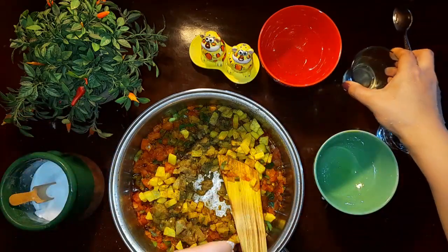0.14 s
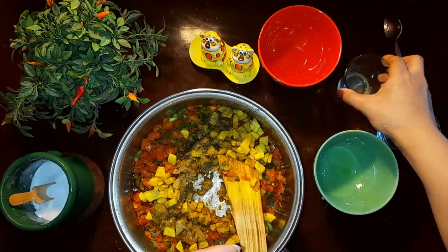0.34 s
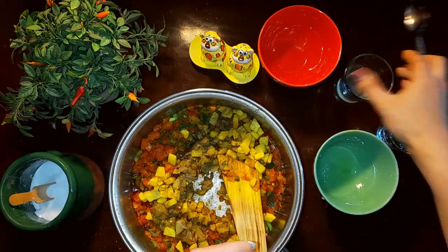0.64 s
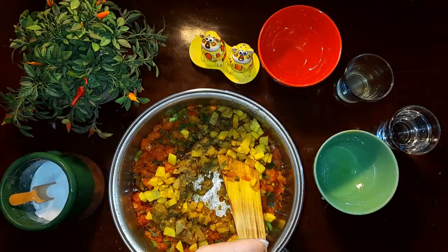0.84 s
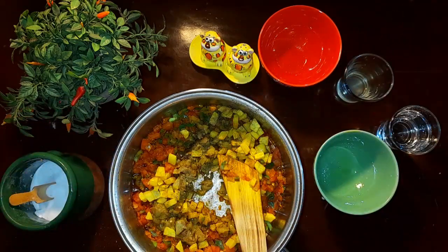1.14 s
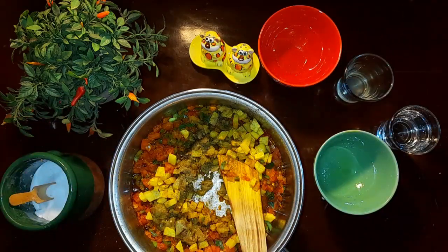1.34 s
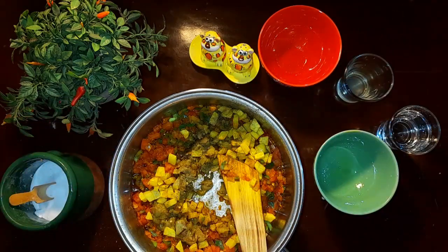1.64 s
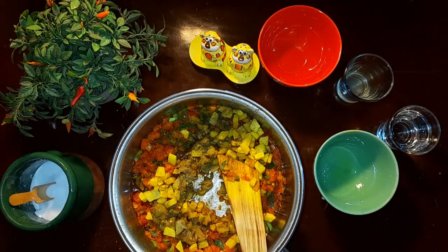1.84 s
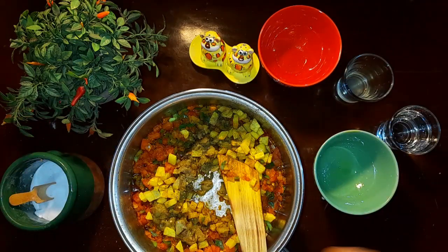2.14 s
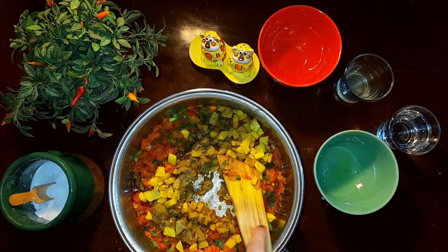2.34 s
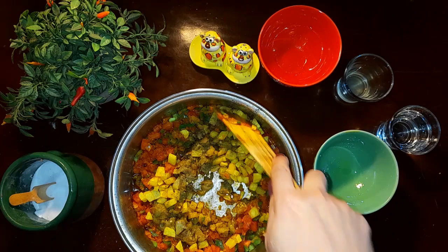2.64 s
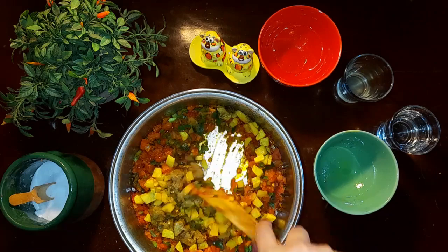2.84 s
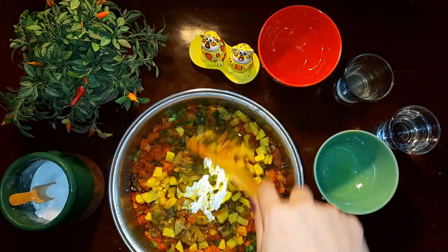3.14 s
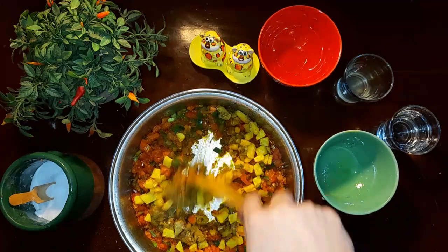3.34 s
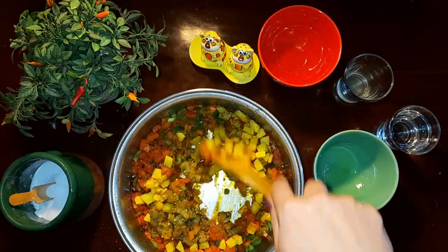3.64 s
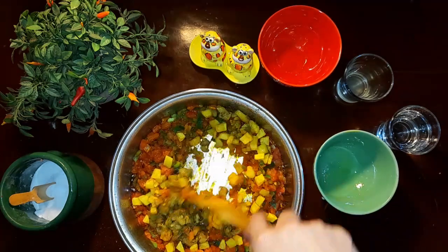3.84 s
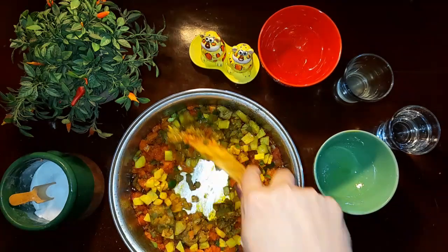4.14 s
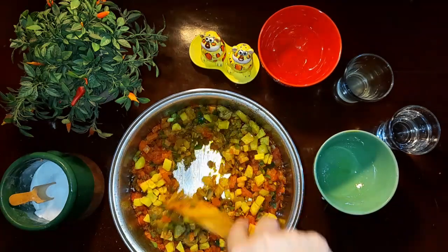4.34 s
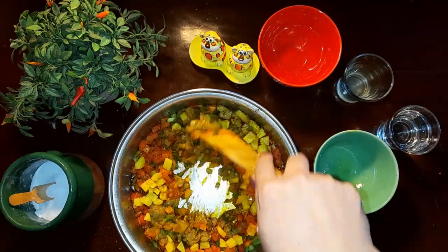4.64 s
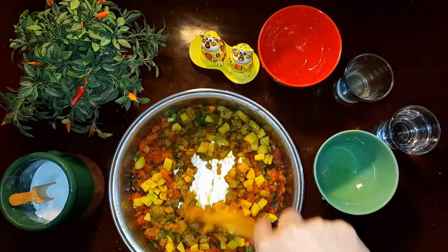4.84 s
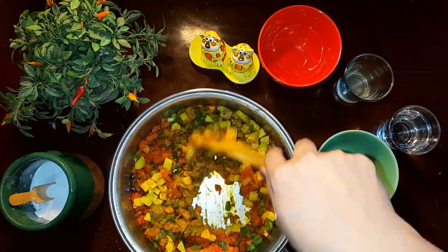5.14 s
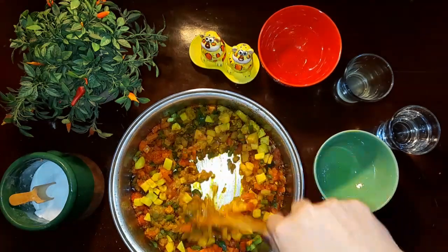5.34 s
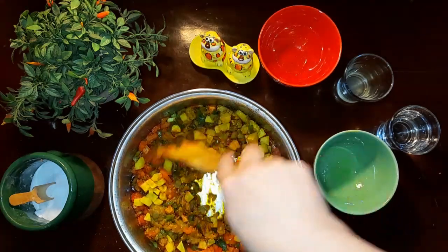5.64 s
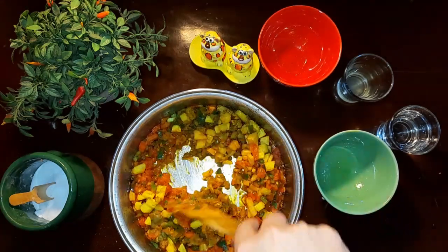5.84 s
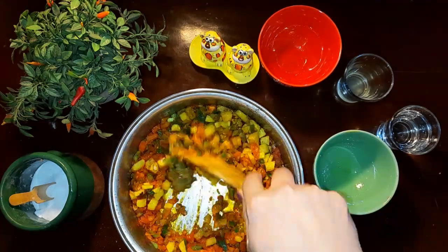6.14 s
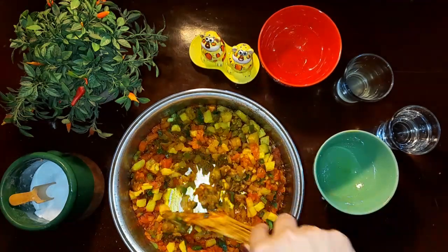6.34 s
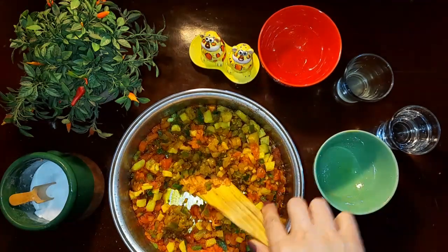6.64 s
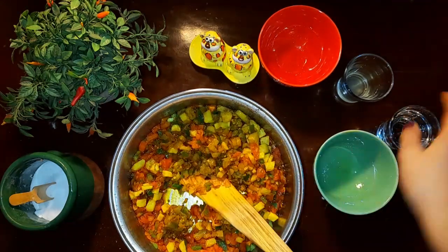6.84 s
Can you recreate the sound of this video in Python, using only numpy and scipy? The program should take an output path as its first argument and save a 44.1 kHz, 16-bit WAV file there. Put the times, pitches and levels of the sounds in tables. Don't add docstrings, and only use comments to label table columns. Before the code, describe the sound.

Close kitchen sounds: glass knock, two bright spoon clinks, then wet, scratchy stirring with tiny snaps, ended by a hollow plastic bowl knock.

```python
import sys
import numpy as np
from scipy import signal
from scipy.fft import rfft, irfft, next_fast_len
from scipy.io import wavfile
from scipy.ndimage import uniform_filter1d, map_coordinates

SR = 44100
rng = np.random.default_rng(int(sys.argv[2]) if len(sys.argv) > 2 else 0)


def gain_from_db(level_db):
    decades = np.asarray(level_db, float) / 20
    return 10 ** decades


def digitize_waveform(pressure):
    field = np.atleast_2d(pressure).T
    bounded = np.clip(field, -1, 1)
    quanta = np.round(bounded * 32767).astype(np.int16)
    wavfile.write(sys.argv[1], SR, quanta)


N = 308700
TIME = np.arange(N) / SR

# [t/s, push lasts/s, dies away in/s, scrape level/dB, wet crackle level/dB]
STROKES = [(2.301, 0.048, 0.13, -76.5, -100), (2.567, 0.043, 0.051, -94, -77),
           (2.633, 0.042, 0.037, -91, -71.5), (2.791, 0.18, 0.058, -73.5, -69.5),
           (3.097, 0.06, 0.14, -74.5, -67), (3.213, 0.064, 0.12, -78, -73), (3.393, 0.0083, 0.43, -72, -67),
           (3.639, 0.0079, 0.17, -69, -65), (3.874, 0.011, 0.14, -59, -58), (4.098, 0.05, 0.16, -66, -63),
           (4.312, 0.048, 0.073, -64, -66.5), (4.39, 0.043, .13, -73, -67),
           (4.589, 0.0082, 0.2, -67, -61.5), (4.809, 0.09, 0.096, -64.5, -62),
           (4.977, 0.027, 0.07, -77, -69.5), (5.05, 0.139, 0.1, -68.5, -63.5),
           (5.286, 0.055, 0.13, -85, -74.5), (5.343, 0.23, 0.09, -70, -65.5), (5.758, 0.16, 0.19, -69, -65),
           (6.055, 0.072, 0.12, -83.5, -72.5), (6.137, 0.17, 0.17, -68, -64.5),
           (6.36, 0.034, 0.067, -64, -60.5), (6.5, 0.18, .15, -78, -66.5)]
# [f/Hz, time to fall 60 dB/s]
KITCHEN = [(100, 0.17), (500, 0.51), (2000, 0.41), (6000, 0.34), (11000, 0.26), (15000, 0.22)]


def along(points, hz):
    f, v = np.transpose(points)
    return np.interp(np.log(hz + 1), np.log(f + 1), v)


def unit(x):
    return x / np.sqrt(np.mean(x ** 2) + 1e-20)


def wobble(rate):
    return map_coordinates(rng.standard_normal(int(N * rate / SR) + 4), [TIME * rate])


def filtered(x, response):
    m = next_fast_len(x.shape[-1] + 8192)
    return irfft(rfft(x, m) * response(np.fft.rfftfreq(m, 1 / SR)), m)[..., :x.shape[-1]]


def diffuse(pair, spectrum):
    # [f/Hz, left-right likeness]
    alike = [(60, 0.95), (130, 0.84), (290, 0.67), (640, 0.47), (1410, 0.1), (3100, 0.08), (6820, -0.04),
             (15000, -0.02)]

    def response(hz):
        turn = np.arccos(np.clip(along(alike, hz), -1, 1)) / 2
        return gain_from_db(along(spectrum, hz)) * [np.cos(turn), np.sin(turn)]

    mid, side = filtered(pair, response)
    return np.array([mid + side, mid - side])


def room(x):
    hz, t, z = signal.stft(rng.standard_normal((2, SR // 2)), SR, nperseg=256)
    fall = gain_from_db(-60 * t / along(KITCHEN, hz)[:, None])
    tail = signal.istft(z * fall, SR, nperseg=256)[1]
    build_up = 1 - np.exp(-TIME[:tail.shape[1]] / 0.0023)
    tail = diffuse(tail * build_up, [(20, 0)])
    return signal.fftconvolve(x[None], tail / np.linalg.norm(tail[0]), axes=1)[:, :len(x)]


def damped(events, cycles, spread, pan_db):
    s, db, hz = np.transpose(events)[:, :, None]
    step = np.arange(int(min(5000, 9 * cycles * SR / hz.min())))
    luck = rng.random((len(s), 10))
    age = step / SR * hz / cycles
    at = np.minimum(np.round(s * SR).astype(int) + step, N - 1).ravel()
    out = []
    for ear, side in enumerate([1, -1]):
        wave = 0
        for k in range(3):
            pitch = np.minimum(hz * (1 + spread * (k - 1) * luck[:, [k]]), 16000)
            wave = wave + np.sin(2 * np.pi * (pitch * step / SR + luck[:, [3 + 3 * ear + k]]))
        size = gain_from_db(db + side * pan_db * (luck[:, [9]] - .5)) * age * np.exp(1 - age)
        out.append(np.bincount(at, (size * wave).ravel(), N))
    return np.array(out)


def stirring():
    # [f/Hz, level/dB per Hz]
    scrape_colour = [(1120, -46.5), (1900, -11), (2970, -2.5), (4900, 2), (6910, -12), (8500, -10.5),
                     (11000, -33), (18700, -120)]
    crackle_colour = [(2350, -56.5), (4000, -1), (8050, -6), (10300, 5), (11900, 2), (14800, -3.5),
                      (16000, -17), (16500, -25)]
    squelch_colour = [(400, -44), (700, 0), (1100, -1), (1900, -2), (2600, -36)]
    # [t/s, peak level/dB, f/Hz]
    snap_events = [(2.4764, -70.5, 9380), (2.7945, -51.5, 12250), (2.8543, -57, 13800),
                   (2.9507, -57.5, 9680), (3.1179, -37.5, 13800), (3.1443, -55, 11400),
                   (3.1678, -49, 11900), (3.2674, -59, 9350), (3.362, -54.5, 9640), (3.3947, -54.5, 10100),
                   (3.4177, -44, 9700), (3.5406, -54, 9220), (3.6324, -48.5, 9120), (3.6545, -49.5, 11400),
                   (3.7827, -59, 9900), (3.876, -41.5, 10800), (3.9569, -50.5, 13500), (4.1086, -45, 10800),
                   (4.2964, -43.5, 10900), (4.3572, -51.5, 12200), (4.3983, -48, 13200),
                   (4.4908, -53, 13700), (4.596, -49, 7530), (4.6596, -54, 9800), (4.6944, -42.5, 9870),
                   (4.779, -54, 10400), (4.8088, -47.5, 10000), (4.8489, -48, 10500),
                   (4.9098, -37.5, 11800), (4.9801, -42, 13200), (4.9977, -53, 14400),
                   (5.0451, -43.5, 11040), (5.128, -46, 9280), (5.1854, -44.5, 12300),
                   (5.2665, -43.5, 12200), (5.2957, -50, 10800), (5.363, -52, 10200), (5.453, -50, 10000),
                   (5.4864, -51, 10200), (5.4973, -49, 12860), (5.5162, -48, 9200), (5.5481, -48, 9120),
                   (5.5744, -51, 14400), (5.7668, -46.5, 9500), (5.8311, -51, 10900), (5.881, -50, 10200),
                   (6.0157, -57, 13900), (6.0541, -57, 9860), (6.113, -53.5, 11500), (6.1402, -51, 8040),
                   (6.2488, -44.5, 11700), (6.2949, -47.5, 10050), (6.3506, -47, 13100),
                   (6.3632, -37, 12400), (6.3891, -42, 11800), (6.4847, -47.5, 9600), (6.5067, -47, 12800),
                   (6.5425, -53.5, 13200), (6.576, -48, 10300), (6.6347, -45, 11900)]
    # [t/s, peak level/dB, f/Hz]
    catches = [(2.477, -68, 3500), (3.4179, -54, 3250), (3.5404, -53, 5170), (3.8582, -59, 3880),
               (3.8757, -39, 3050), (3.888, -44, 3300), (4.0921, -48, 3580), (4.1091, -45.5, 3920),
               (4.323, -47.5, 4400), (4.5961, -41, 4500), (4.9095, -49, 5250), (5.3523, -62, 3870),
               (6.133, -53.5, 4650), (6.1684, -50, 4900), (6.1988, -49, 5360), (6.3372, -51.5, 4000)]
    # [t/s, peak level/dB, f/Hz, ring of the steel/dB]
    bump_events = [
        (2.916, -66, 605, -103),
        (3.881, -60.5, 246, -88),
        (4.101, -52, 274, -87),
        (5.039, -67, 238, -72),
        (5.14, -52.5, 236, -92.5),
        (5.765, -66, 863, -79),
        (5.799, -72, 227, -78),
        (6.201, -59, 247, -76.5),
    ]
    scrape_top, crackle_top = np.transpose(STROKES)[-2:]
    scrape_db = strokes(scrape_top, dies=1.45)
    crackle_db = strokes(crackle_top, dies=1)
    squelch_db = -94 + 0.86 * (scrape_db - scrape_top.mean())

    squelch = gain_from_db(squelch_db + 7.5 + 3.1 * wobble(29)) * unit(diffuse(patchy(depth_db=3.5), squelch_colour))
    scrape = gain_from_db(scrape_db - 2.5 + 3.5 * wobble(30)) * unit(diffuse(patchy(depth_db=3.0), scrape_colour))
    crackle = gain_from_db(crackle_db - 0.5 + 1.8 * wobble(40)) * unit(diffuse(patchy(depth_db=5.5), crackle_colour))

    hits = tumbling(scrape_db - 5.5, count=700, centre_hz=4350, spread_db=4)
    hits += tumbling(crackle_db - 8.0, count=2000, centre_hz=10420, spread_db=5.0)
    hits += gain_from_db(-2.5) * damped(snap_events, cycles=2.1, spread=0.4, pan_db=9)
    hits += gain_from_db(-4.0) * damped(catches, cycles=3.0, spread=0.094, pan_db=5.5)
    thumps = [(s, db, hz) for s, db, hz, _ in bump_events]
    steel = [(s, ring_db, 2170) for s, _, _, ring_db in bump_events]
    hits += gain_from_db(1.0) * damped(thumps, cycles=2.1, spread=0.17, pan_db=2.0)
    hits += damped(steel, cycles=42, spread=.03, pan_db=3)
    return scrape + crackle + squelch + hits + gain_from_db(-11.5) * room(hits[0])


def strokes(top_db, dies):
    bite_db, bite_s = 11.5, 0.0056
    lead_db_per_s, sag_db_per_s = 230, 13
    s, push, fade = np.transpose(STROKES)[:3, :, None]
    age = TIME[::64] - s
    before = bite_db * np.clip(-age / bite_s, 0, 1) + lead_db_per_s * np.maximum(-age, 0)
    sag = sag_db_per_s * np.clip(age, 0, push)
    after = sag + dies * 20 * np.maximum(age - push, 0) / fade
    level = np.sum(gain_from_db(top_db[:, None] - before - after), 0) + 1e-7
    level_db = np.interp(TIME, TIME[::64], 20 * np.log10(level))
    return np.where(TIME < 6.73, level_db, -140)


def patchy(depth_db):
    z = signal.stft(rng.standard_normal((2, N)), nperseg=256)[2]
    field = uniform_filter1d(rng.standard_normal(z.shape[1:]), size=22, axis=0)
    field = uniform_filter1d(field, size=2, axis=1)
    return signal.istft(z * gain_from_db(depth_db * unit(field)), nperseg=256)[1][:, :N]


def tumbling(level_db, count, centre_hz, spread_db):
    luck = rng.random((count, 3))
    s = 2.2 + 4.5 * luck[:, 0]
    hz = np.clip(centre_hz * 2 ** (1.43 * (luck[:, 1] - .5)), 2500, 15000)
    size_db = level_db[(s * SR).astype(int)] - spread_db * np.log(luck[:, 2] + 0.07)
    return damped(np.transpose([s, size_db, hz]), cycles=1.7, spread=.3, pan_db=6.5)


def glass_down():
    # [t/s, peak level/dB]
    hit = [
        (.4775, -25.5),
        (.4802, -13),
        (.4875, -18),
        (.524, -27),
        (.552, -26),
    ]
    # [f/Hz, level/dB, time to fall 60 dB/s]
    wood = [(128.7, -1, 0.12), (258, 3.5, .12), (430, 0, 0.081), (477, -2.5, 0.22), (598, -3, .08),
            (673.7, 2, 0.11), (823, -9, 0.072), (967, -11, .1), (1136, -9, .1), (1433, -11.5, .08),
            (1666, -11, .1), (1716, -7, 0.11), (2050, -8, .09), (2410, -9, .07)]
    jingle = [(2900, -19, .08), (4720, -22, .15), (4770, -14, .1), (6336, -22.5, .1), (8091, -26, .1),
              (8323, -26, .1), (9500, -25, .12), (11100, -27.5, .1), (11830, -30, .12), (12550, -28, .09),
              (13800, -29, .09), (14760, -29.5, .1)]
    # [f/Hz, level/dB per Hz]
    thud = [(29, -48.5), (50, -76.5), (108, -7), (193, -6.5), (418, -5), (927, -7.5), (1700, -12),
            (4240, -28.5), (4790, -28), (7390, -37), (8140, -31.5), (14200, -37.5), (16000, -40.5)]
    # [f/Hz, left over right/dB]
    place = [(300, 0), (3000, 2), (7000, 3), (10000, 5), (15000, 2.5)]
    return blow(hit, wood + jingle, thud, place, ring_db=-18.0, crowd_db=-6.5, rise_s=0.0012,
                build_cycles=0.92, rattle=0.7, crack_db=-0.5, crack_s=.08, wet_db=-1)


def glass_ring():
    let_go_s, swell_s, stilled_s = .7, .08, 1.023
    phase = 2 * np.pi * 1625 * TIME
    age = TIME - let_go_s
    fall_db = np.maximum(-62 - 148 * np.maximum(age, 0), -80.5)
    edge = np.maximum(-age, 2 * (TIME - stilled_s)) / swell_s
    return gain_from_db(fall_db - 41 * np.clip(edge, 0, 4)) * np.array([np.sin(phase), np.sin(phase + 2.4)])


def spoon_down():
    # [t/s, peak level/dB]
    hit = [
        (1.3457, -10),
        (1.3565, -21),
        (1.3655, -17),
    ]
    # [f/Hz, level/dB, time to fall 60 dB/s]
    counter = [(150, -24, .1), (244, -16, 0.12), (305, -13, 0.14), (428.2, -10, .09), (640, -26, .06),
               (1140, -27.5, .06), (1780, -27, .06), (2310, -23.5, 0.065)]
    steel = [(2874, -8.5, .1), (3330, -20, 0.12), (4598, -11.5, 0.11), (4747, -9, 0.099),
             (6320, -13.5, .14), (6800, -16, .1), (7060, -7.5, 0.087), (8000, -14.5, 0.055),
             (8274, -2.5, 0.099), (9792, -9.5, .13), (10120, -4.5, .07), (11240, -7, 0.076),
             (11330, -2.5, .07), (11765, -15, 0.093), (12680, -15, 0.045), (13900, -8.5, 0.066),
             (14600, -3, .03), (15340, -11.5, .07)]
    # [f/Hz, level/dB per Hz]
    clink = [(35, -43.5), (60, -10), (422, -9), (1400, -18.5), (2830, -10.5), (4640, -10), (5870, -14.5),
             (8150, -3.5), (8960, -18), (10800, -8.5), (15000, -13), (16500, -32)]
    # [f/Hz, left over right/dB]
    place = [(300, -0.5), (3000, 6), (7500, 2.5), (9800, 8), (15000, 4)]
    return blow(hit, counter + steel, clink, place, ring_db=-7.0, crowd_db=-7, rise_s=0.0003,
                build_cycles=5.9, rattle=0.6, crack_db=-0.5, crack_s=0.03, wet_db=-3.5)


def spoon_drop():
    # [t/s, peak level/dB]
    hit = [
        (1.8632, -14.5),
        (1.8725, -15),
        (1.885, -24),
    ]
    # [f/Hz, level/dB, time to fall 60 dB/s]
    steel = [(2790, -20, .15), (3377, -13, 0.19), (4710, -15.5, .25), (6293, -13, .17),
             (7200, -21.5, 0.072), (7570, -20.5, .08), (7960, -16.5, .1), (8200, -13, .08),
             (9510, -12.5, 0.061), (9771, 4, 0.059), (10138, -19.5, .1), (11220, -8.5, .08),
             (11700, -7.5, .1), (12500, -16.5, .12), (13220, -15, 0.092), (13920, -12, .11),
             (14630, -8.5, .09), (15300, -16, .07)]
    # [f/Hz, level/dB per Hz]
    clank = [(60, -29), (400, -14), (694, -17), (1580, -22.5), (2790, -12.5), (3900, -13), (8230, -16),
             (8890, -22), (9860, 0.5), (10600, -20), (11500, -17.5), (14900, -10), (16500, -39.5)]
    # [f/Hz, left over right/dB]
    place = [(1000, 5), (4500, 1), (7500, 2), (9800, 13), (12000, 5.3), (15000, 3.7)]
    # [t/s, peak level/dB, f/Hz]
    jolt = [
        (1.863, -25, 62),
        (1.863, -21, 130),
        (1.864, -23, 210),
    ]
    shock = damped(jolt, cycles=.38, spread=0.15, pan_db=0.5) * gain_from_db([[-3.0], [-30]])
    return shock + blow(hit, steel, clank, place, ring_db=-5.0, crowd_db=-13, rise_s=0.0007,
                        build_cycles=3, rattle=.35, crack_db=-1.5, crack_s=.06, wet_db=-3.0)


def bowl_knock():
    # [t/s, peak level/dB]
    hit = [
        (6.7445, -24),
        (6.7675, -31),
    ]
    # [f/Hz, level/dB, time to fall 60 dB/s]
    shell = [(236, -12, 0.14), (303, -11, 0.13), (374.7, 3, 0.12), (522, -7, 0.14), (705, -16, 0.095),
             (969.3, -22, 1.05), (1263, -11, .1), (1790, -15, .09), (1890, -17, 0.21), (2352, -14, 0.16),
             (2700, -13, 0.062), (3327, -15, .22), (3530, -10, .1), (4120, -11, 0.18), (4207, -8, 0.22),
             (4335, -11, .13), (4480, -9, .1), (4585, 0, 0.13), (5030, 2, 0.098), (5604, -16, 0.18)]
    # [f/Hz, level/dB per Hz]
    knock = [(88, -70), (150, -28), (368, -10), (637, -9.5), (1240, -12.5), (1630, -17), (2550, -9),
             (3770, -18.5), (5050, -16), (6000, -12.5), (14400, -20.5), (15200, -46)]
    # [f/Hz, left over right/dB]
    place = [(400, 0), (2500, 1.5), (5000, -3), (7500, 0.5), (9800, 6.5), (15000, -9)]
    # [t/s, peak level/dB, f/Hz]
    clicks = [
        (6.7452, -33.5, 1178),
        (6.7462, -32.5, 2080),
        (6.7458, -32, 2560),
        (6.7452, -23.5, 6230),
        (6.7452, -35, 8800),
        (6.7672, -38, 1150),
        (6.7675, -38, 2570),
    ]
    contact = gain_from_db(-5.5) * damped(clicks, cycles=2.3, spread=.1, pan_db=2)
    return contact + blow(hit, shell, knock, place, ring_db=-8.0, crowd_db=-11.5, rise_s=0.0046,
                          build_cycles=5.8, rattle=0.23, crack_db=4.5, crack_s=0.033, wet_db=-4.5)


def blow(hit, modes, colour, place, ring_db, crowd_db, rise_s, build_cycles, rattle, crack_db, crack_s, wet_db):
    s, db = np.transpose(hit)
    lag = np.round((s - s[0]) * SR).astype(int)
    ring = ringing(lag, db, modes, ring_db, crowd_db, rise_s, build_cycles, rattle)
    crack, push = cracking(colour, crack_db, crack_s)
    bounces = np.bincount(lag, gain_from_db(db))[None]

    def again(x):
        return signal.fftconvolve(x, bounces, axes=1)[:, :x.shape[1]]

    push = again(push[None])[0] * np.linalg.norm(crack[0]) / np.linalg.norm(push)
    walls = room(gain_from_db(-7) * ring[0] + push)
    ears = ring + again(crack) + gain_from_db(wet_db) * walls
    ears = filtered(ears, lambda hz: gain_from_db(np.outer([.5, -.5], along(place, hz))))
    ears[1] = np.roll(ears[1], 12)
    out = np.zeros((2, N))
    part = out[:, round(s[0] * SR):]
    part += ears[:, :part.shape[1]] if part.shape[1] <= ears.shape[1] else np.pad(
        ears, ((0, 0), (0, part.shape[1] - ears.shape[1])))
    return out


def ringing(lag, db, modes, ring_db, crowd_db, rise_s, build_cycles, rattle):
    wood_hz, neighbour = 797, .022
    t = TIME[:SR // 2]
    luck = rng.standard_normal((len(modes), 8))
    hz, level, t60 = np.transpose(modes)[:, :, None]
    crowd_db = np.where(hz < wood_hz, -40, crowd_db)
    hz = np.concatenate([hz, hz * (1 + neighbour * luck[:, [0]]), hz * (1 + neighbour * luck[:, [1]])])
    level = np.concatenate([level, level + crowd_db, level + crowd_db])
    t60 = np.concatenate([t60, 0.8 * t60, 1.2 * t60])

    knots = rattle * unit(uniform_filter1d(rng.standard_normal((len(hz), 2, 230)), size=3))
    knot, part = np.divmod(np.arange(len(t)) / 100, 1)
    knot = knot.astype(int)
    shake = knots[..., knot] * (1 - part) + knots[..., knot + 1] * part

    fall = gain_from_db(-60 * t / t60) + gain_from_db(-13 - 60 * t / along(KITCHEN, hz))
    rise = 1 - np.exp(-t / (rise_s + build_cycles / hz * (hz < wood_hz)))
    once = gain_from_db(level + ring_db) * fall * rise ** 1.5
    energy = 0
    for k, d in zip(lag, db):
        energy = energy + np.pad(gain_from_db(2 * d) * once ** 2, ((0, 0), (k, 0)))[:, :len(t)]
    apart = np.clip(hz / 1500, 0, 1) ** 2
    turn = None
    ear_phase = 2 * luck[:, 2:].T.reshape(2, -1, 1)
    turn = apart * (ear_phase + shake.swapaxes(0, 1))
    return np.sum(np.sqrt(energy) * np.sin(2 * np.pi * hz * t + turn), 1)


def cracking(colour, crack_db, crack_s):
    t = TIME[:SR // 2]
    burst = rng.standard_normal((2, len(t))) * gain_from_db(-60 * t / crack_s) * (1 - np.exp(-t / 0.000087))
    m = next_fast_len(len(t))
    cep = irfft(np.log(gain_from_db(along(colour, np.fft.rfftfreq(m, 1 / SR))) + 1e-6), m)
    cep[1:m // 2] *= 2
    cep[m // 2 + 1:] = 0
    response = np.exp(rfft(cep))
    crack = irfft(rfft(diffuse(burst, [(20, 0)]), m) * response, m)[:, :len(t)]
    push = irfft(response, m)[:len(t)]
    return gain_from_db(crack_db) * crack / np.abs(crack).max(), push


def background():
    # [t/s, level/dB]
    rumble_level = [(0.0, -63.5), (0.56, -58.5), (1.87, -62), (2.11, -69), (3.08, -67.5), (3.27, -63),
                    (4.13, -61), (5.17, -63), (5.71, -64.5), (7.0, -59.5)]
    # [f/Hz, level/dB per Hz]
    rumble_colour = [(12, -42), (20, -3.5), (72, 5), (150, 2), (199, -3), (244, -5.5), (295, -7.5),
                     (387, -14.5), (484, -13), (536, -21.5), (584, -23.5), (670, -21.5), (743, -33),
                     (1200, -37.5), (1560, -63), (2640, -120)]
    hiss_colour = [(350, -31.5), (600, -10.5), (988, -12.5), (1340, -20.5), (2000, -14), (2370, -15),
                   (3400, -17), (3540, -24), (4670, -16), (8130, -25), (9220, -11.5), (10600, -17),
                   (15200, -17), (16500, -29)]
    # [f/Hz, wander of the pitch/Hz, level/dB]
    hum = [
        (92, 18, -2.5),
        (147.5, 18, -5.5),
        (240.5, 6.2, -1.5),
        (452, 5.3, -11.5),
    ]
    rumble_db = np.interp(TIME, *np.transpose(rumble_level))
    swing_db = rumble_db - rumble_db.mean()
    rumble = unit(diffuse(rng.standard_normal((2, N)), rumble_colour))
    out = gain_from_db(rumble_db + 1.5 + 1.5 * wobble(7)) * rumble
    for hz, wander_hz, db in hum:
        phase = 2 * np.pi * np.cumsum(hz + wander_hz * wobble(12)) / SR
        size = gain_from_db(-67 + swing_db + db + 1.0 + 2.4 * wobble(7.8))
        out += size * np.array([np.sin(phase), np.sin(phase + hz / 400)])
    fridge = 2 * np.pi * np.cumsum(484.5 + .7 * wobble(14.0)) / SR
    out += gain_from_db(-76.5 + 2.5 * wobble(8.8)) * np.array([np.sin(fridge), np.sin(fridge + 0.33)])
    hiss = unit(diffuse(rng.standard_normal((2, N)), hiss_colour))
    return out + gain_from_db(-79.5 + .4 * swing_db + 0.63 * wobble(8.2)) * hiss


def scene():
    blows = glass_down() + spoon_down() + spoon_drop() + bowl_knock()
    return stirring() + blows + glass_ring() + background()


def roll_off(x):
    return signal.sosfilt(signal.butter(12, 16790, fs=SR, output="sos"), x)


def record(dry):
    # [f/Hz, left over right/dB]
    lean = [(60, -3.5), (110, -2), (200, -2.5), (380, 3.5), (700, 1.5), (1290, -2), (2380, -1.5),
            (4400, -1.0), (8120, -2), (15000, 6.5)]

    def capsules(hz):
        balance = gain_from_db(np.outer([.5, -.5], along(lean, hz)))
        delay = np.exp(np.outer([0, -1j], 2 * np.pi * hz * 3 / SR))
        treble_end = gain_from_db(-22 * np.clip((hz - 15700) / 500, 0, 1))
        bass_end = hz ** 2 / (hz ** 2 + 32 ** 2)
        return balance * delay * treble_end * bass_end

    bent = dry / (1 + np.abs(dry / .88) ** 6) ** (1 / 6)
    return roll_off(filtered(bent, capsules))


dry = scene()
out = record(dry)
digitize_waveform(out)
```